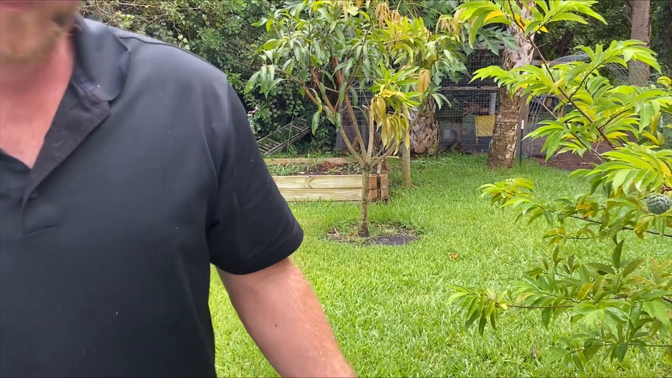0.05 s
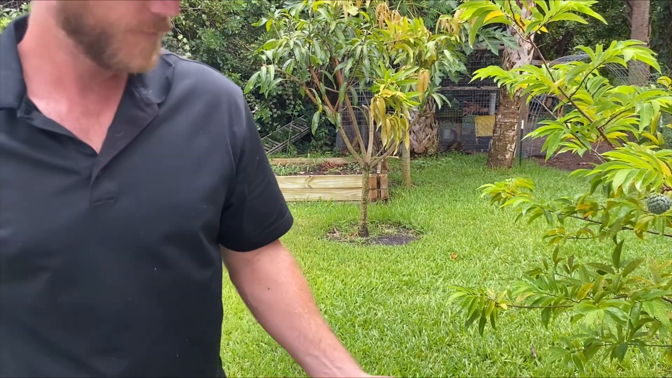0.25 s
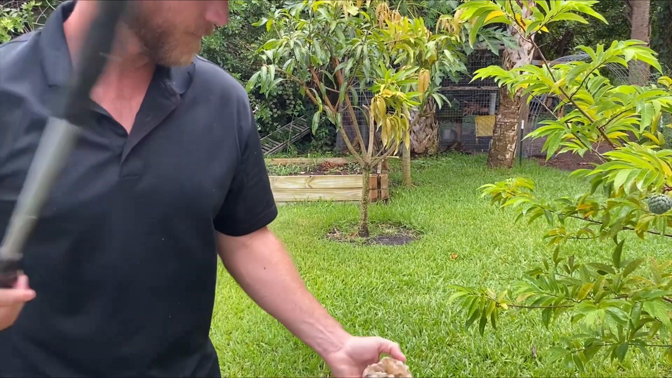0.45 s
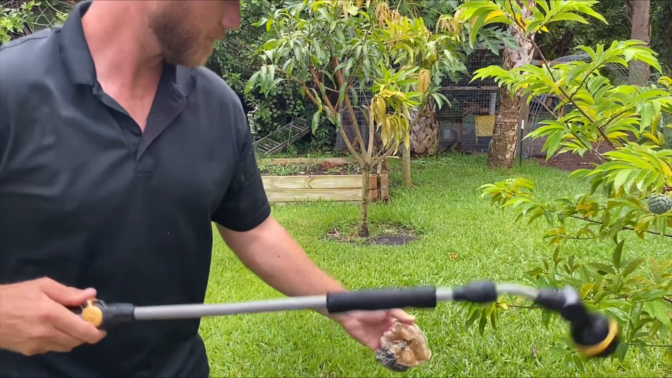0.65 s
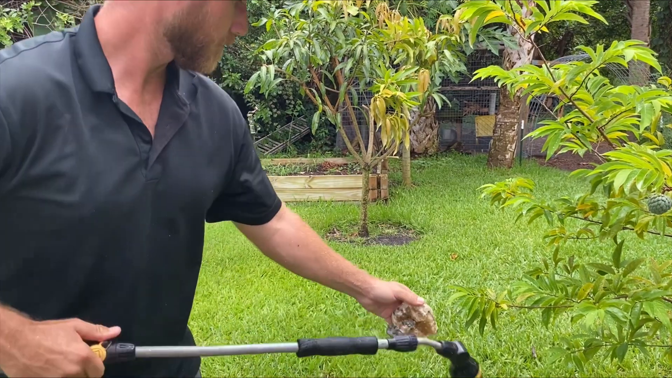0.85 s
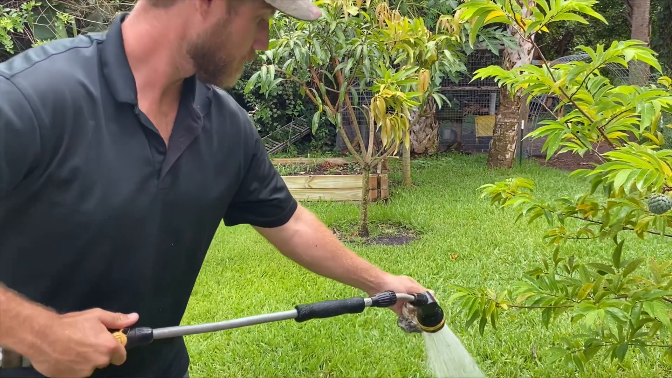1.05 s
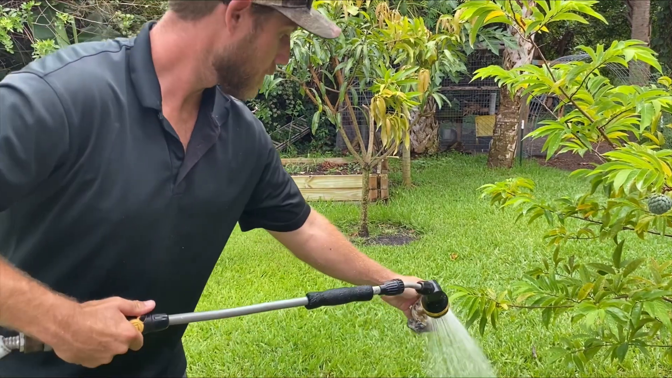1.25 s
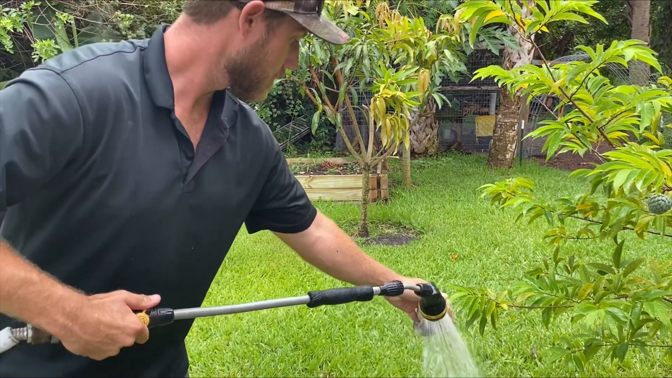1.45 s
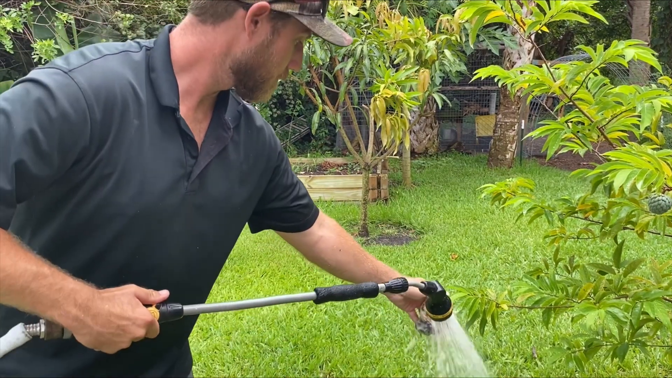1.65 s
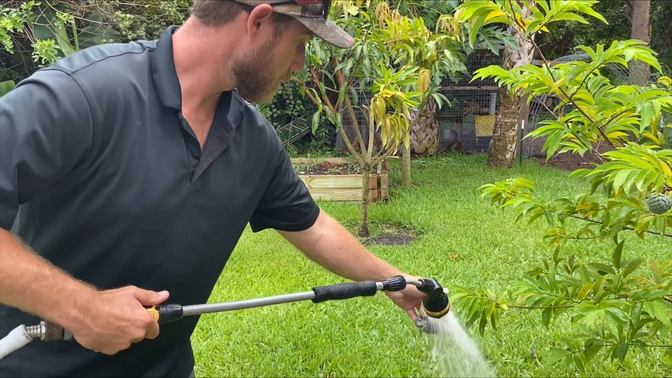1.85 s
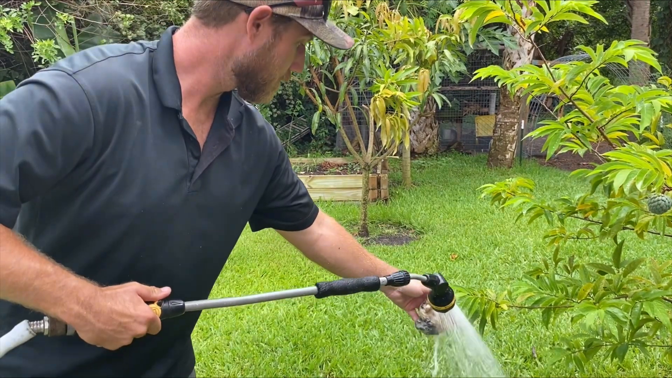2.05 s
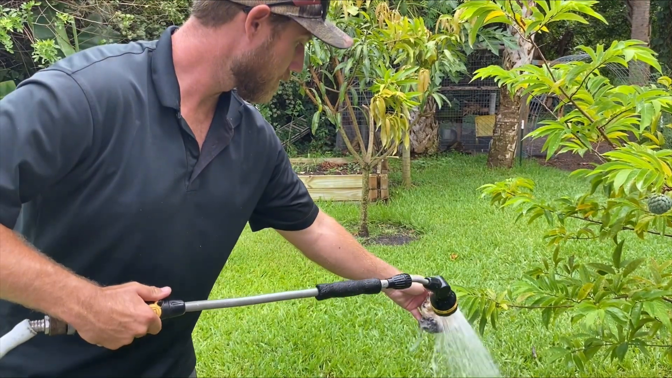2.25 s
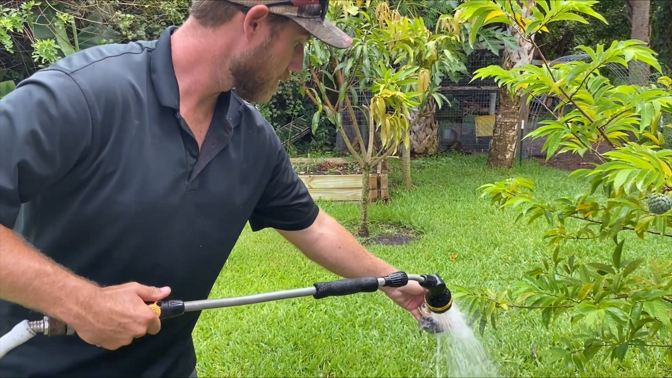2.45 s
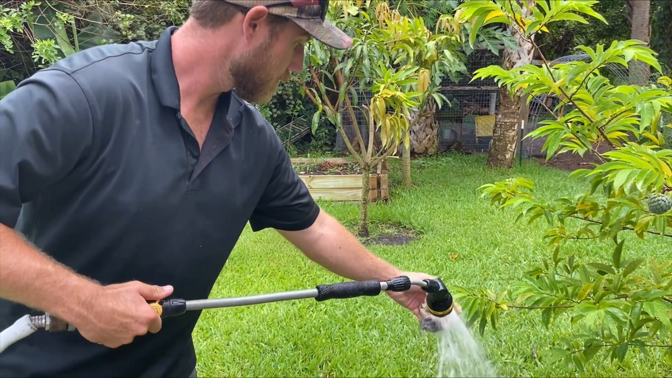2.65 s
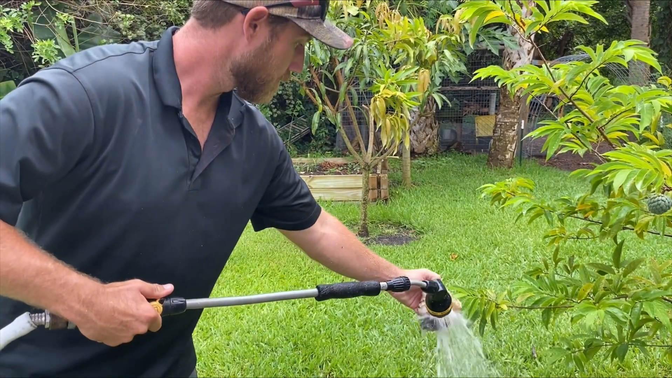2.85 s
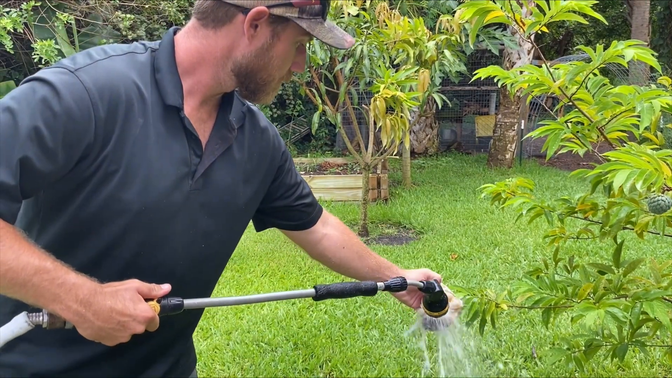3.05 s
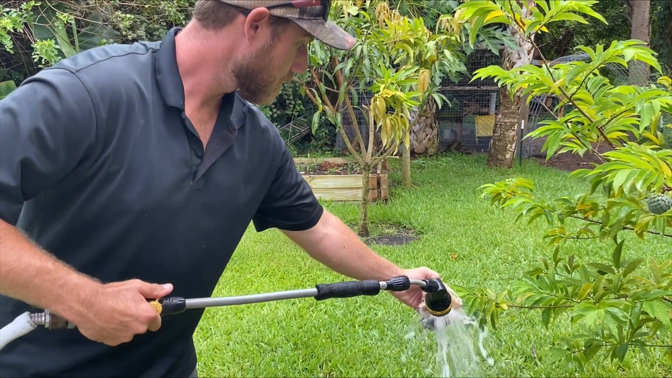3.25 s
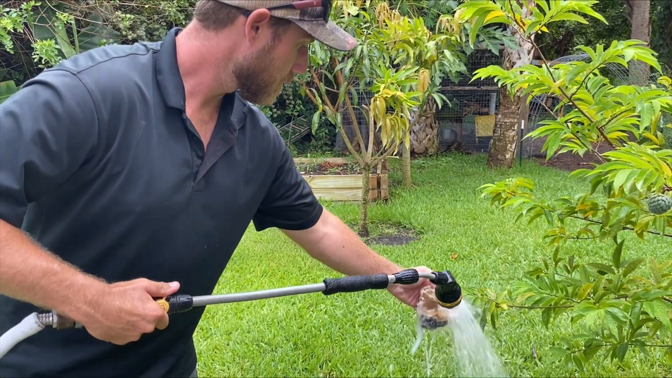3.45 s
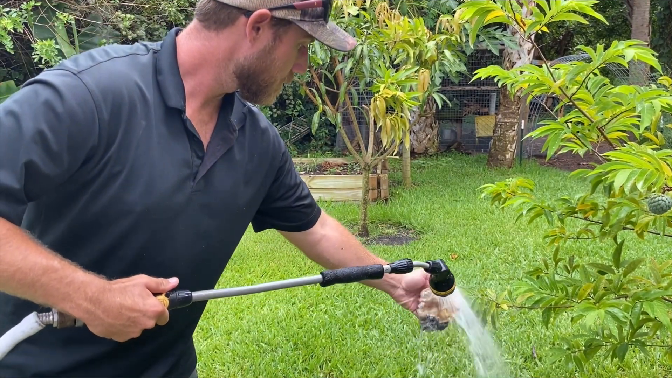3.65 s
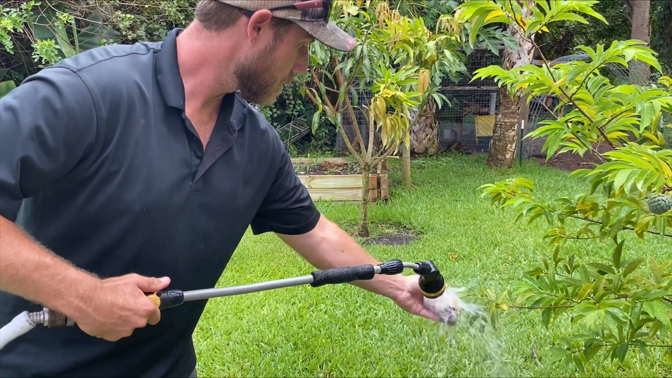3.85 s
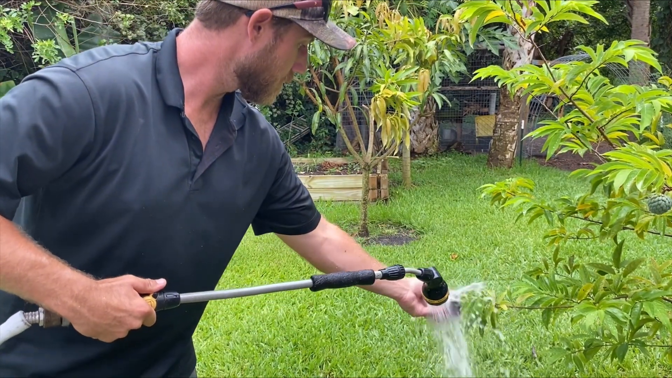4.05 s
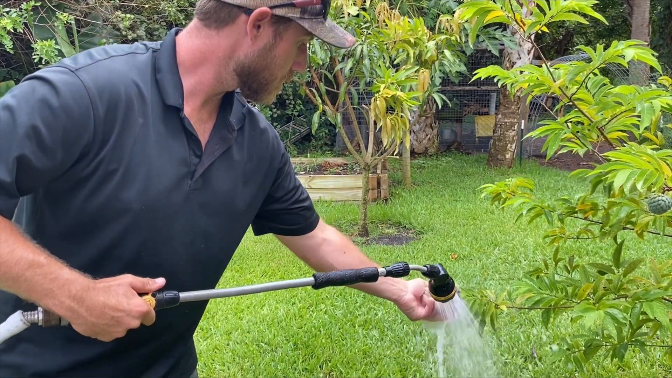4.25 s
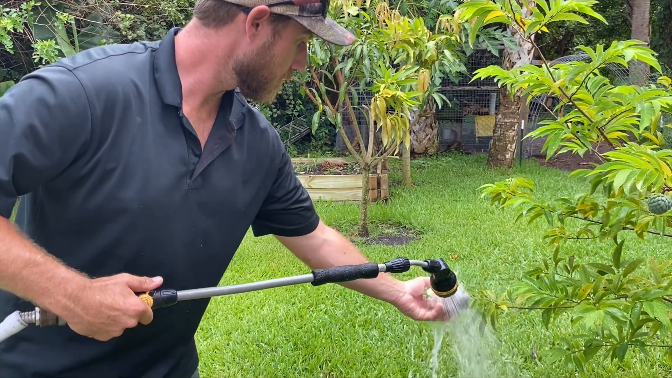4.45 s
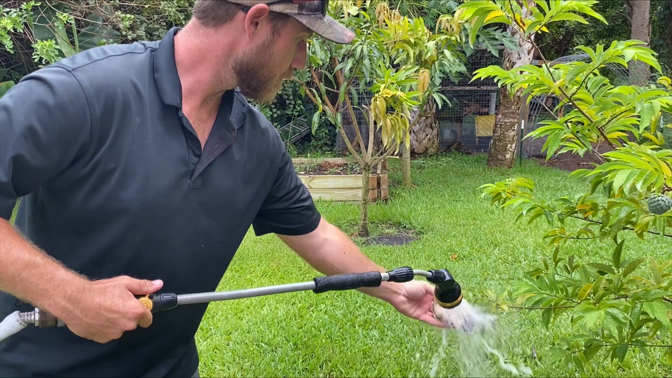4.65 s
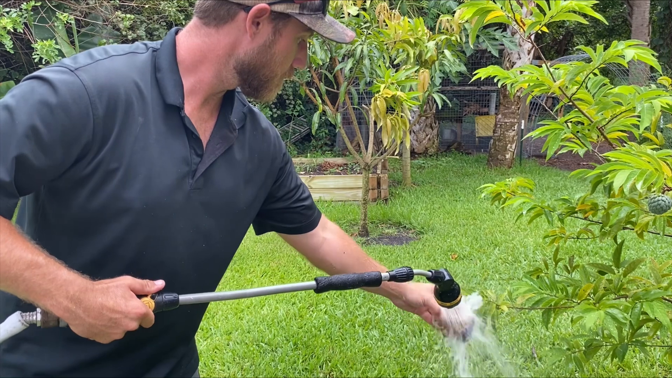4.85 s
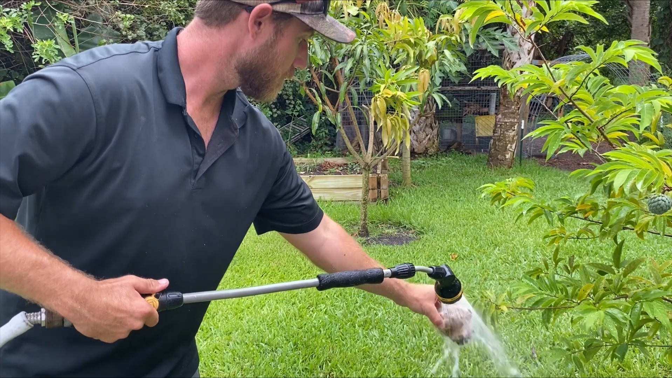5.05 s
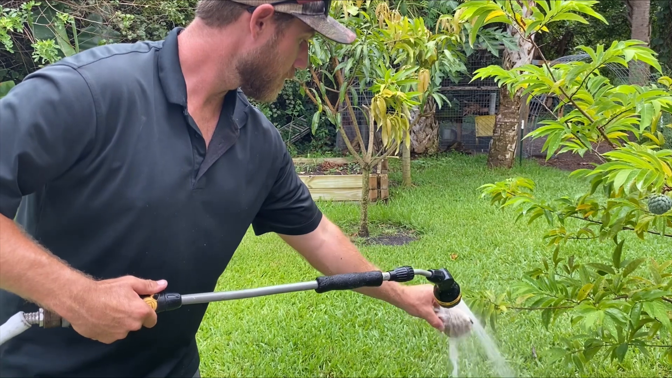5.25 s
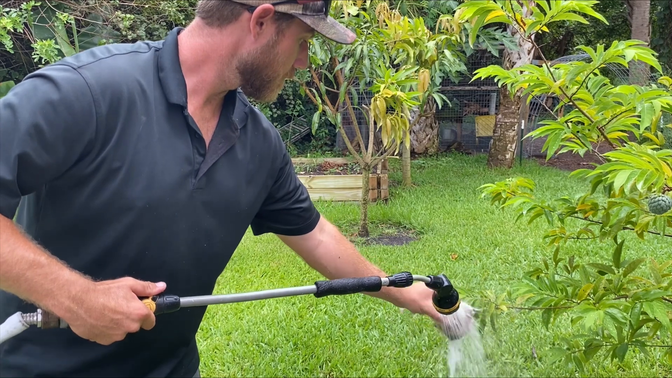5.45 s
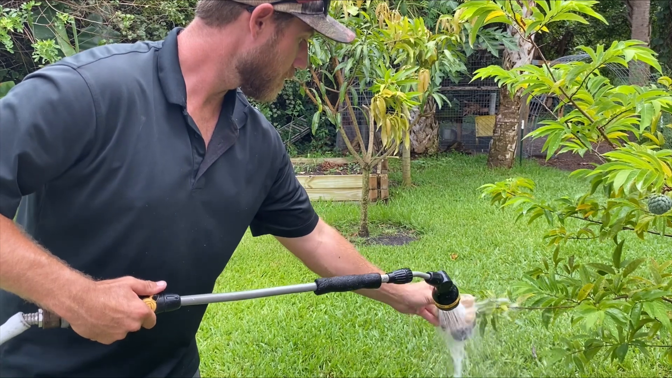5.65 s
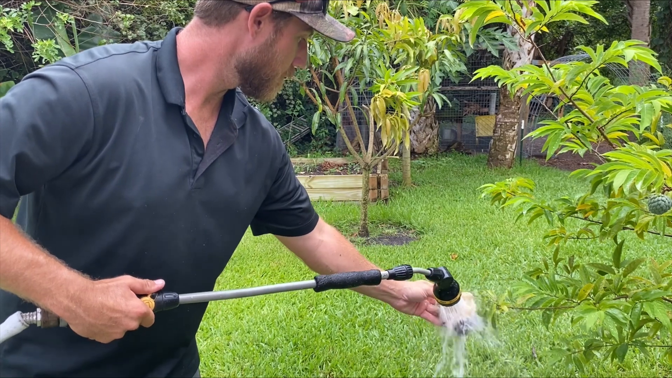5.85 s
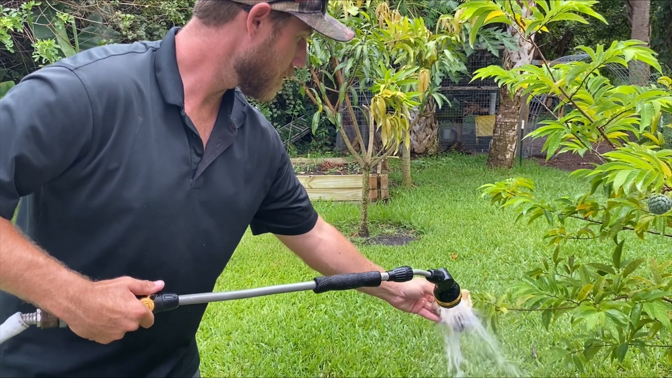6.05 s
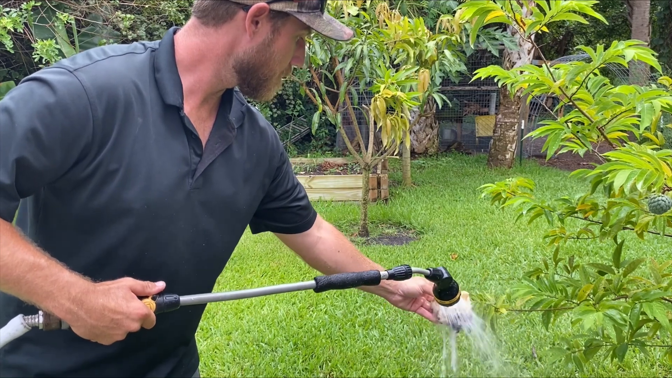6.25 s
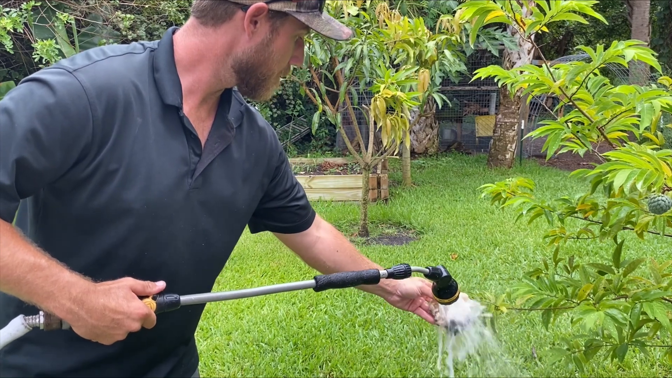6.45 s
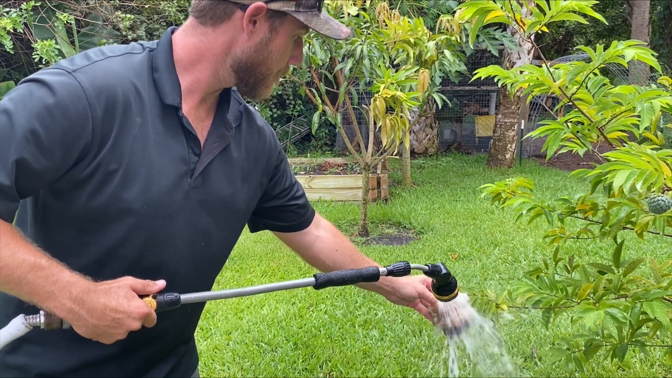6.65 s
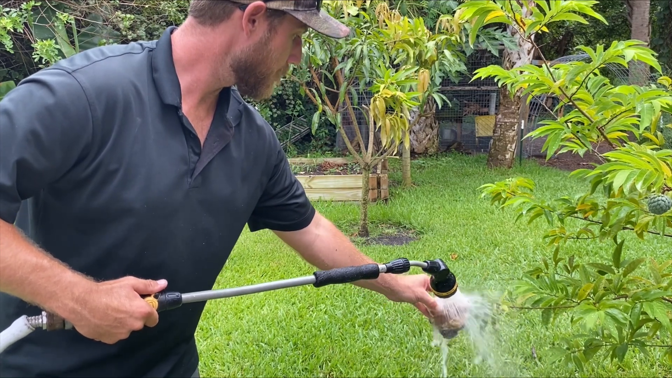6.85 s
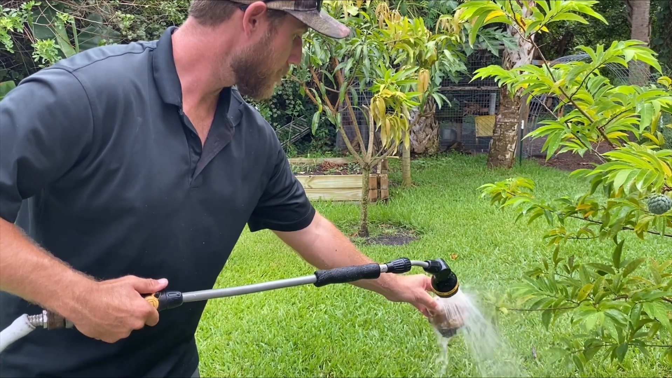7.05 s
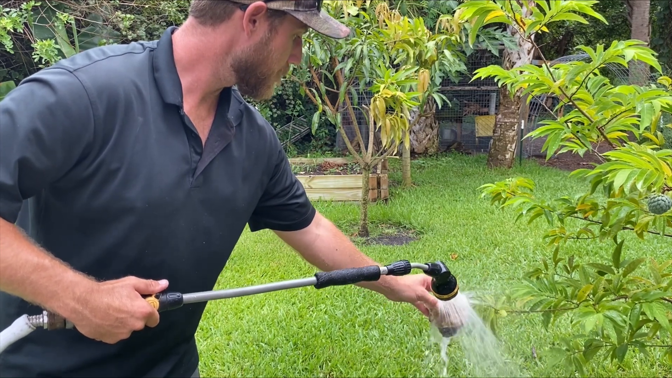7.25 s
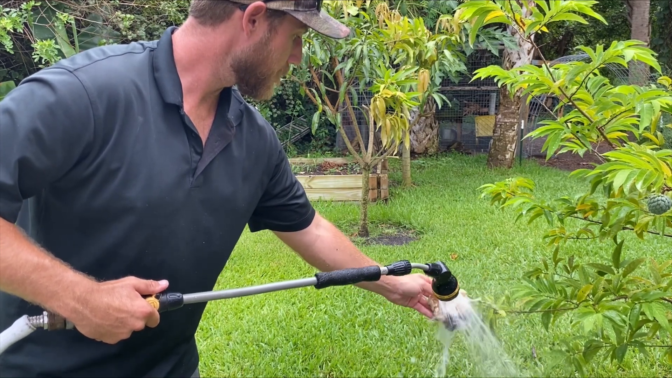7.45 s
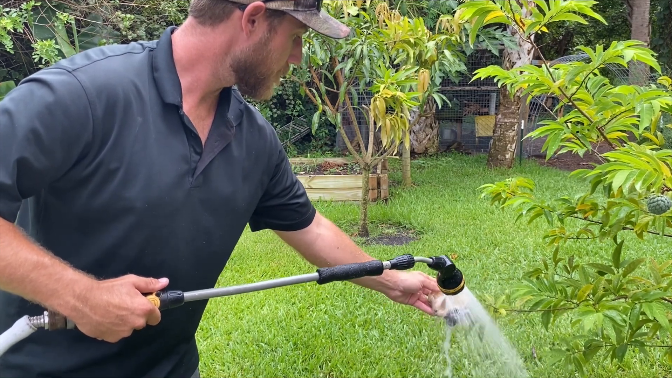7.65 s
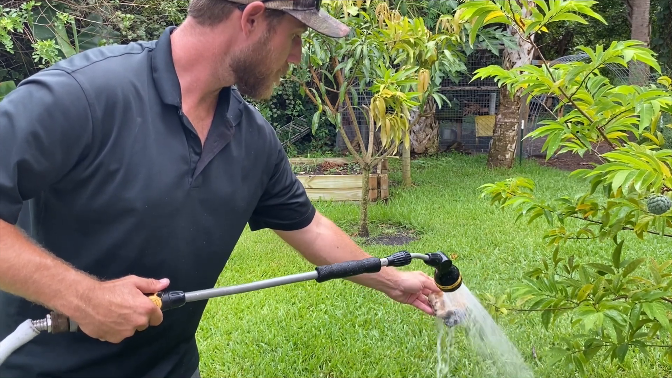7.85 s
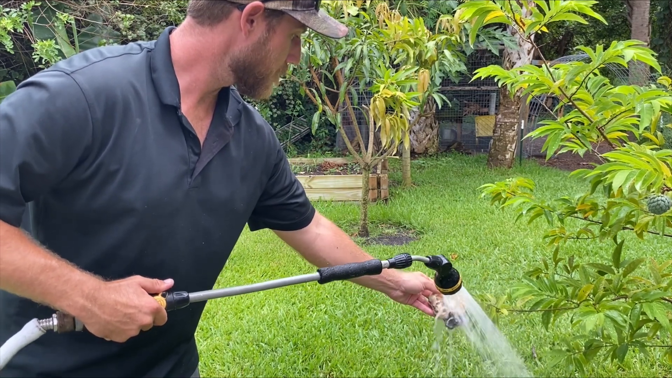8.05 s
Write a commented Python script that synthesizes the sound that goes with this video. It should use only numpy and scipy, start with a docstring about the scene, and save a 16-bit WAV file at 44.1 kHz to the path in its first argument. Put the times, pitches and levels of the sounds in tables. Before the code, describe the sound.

A quiet backyard, heard close in stereo: a soft low distant rumble, faint open air and a thin high insect shimmer. From 0 to 0.45 s a shirt rustles and tiny dry ticks come from handling a watering wand, with another rustle near 0.6. At 0.67 the valve opens: trapped air spits and whistles briefly, water thumps and sputters until about 0.85. A lighter spray follows, and from 1.2 brisk splatter begins as a hand enters the jets. To 3.4 s it is dense, with sharp drops and gurgles; from 3.4 to 5.9 it comes in looser bursts, hissing fans and rising bubbles in the palm. Around 6.0 to 6.7 the splashing is strong and cupped, then thins to mostly hiss until 7.3, when bright splatter returns, continuing unevenly to the end just past 8 s. The hiss grows slightly; only faint, short body reflections, no room echo.

```python
"""A shirt rustles and small ticks sound over a low distant rumble and faint insects in a backyard.
A watering wand opens: trapped air whistles and water sputters out, then fine jets hiss as random impacts.
Drops splatter on a turning hand as impacts and damped bubble rings, and gurgle in its palm.
Noise sources are random signals shaped by a spectrum and an envelope; short delays add reflections off the body."""
import sys
import numpy as np
from scipy import signal
from scipy.fft import rfft, irfft, next_fast_len
from scipy.io import wavfile
from scipy.ndimage import uniform_filter1d, map_coordinates

SR = 44100
rng = np.random.default_rng(int(sys.argv[2]) if len(sys.argv) > 2 else 0)


def master(y):
    """Save y as 16-bit WAV."""
    cut = np.clip(np.atleast_2d(y).T, -1, 1)
    pcm = np.round(cut * 32767)  # scale
    wavfile.write(sys.argv[1], SR, pcm.astype(np.int16))


N = 357210
TOP_HZ = 15850  # upper limit of the band


def amp(db):
    """Level to amplitude: 20 dB is a factor of ten."""
    return 10 ** (np.asarray(db) / 20)


def unit(x):
    """Normalization: scale to rms 1."""
    return x / np.sqrt(np.mean(x ** 2) + 1e-20)


def along(points, hz):
    """Interpolation of (frequency, value) points on a logarithmic frequency axis."""
    f, v = np.transpose(points)
    return np.interp(np.log(hz + 1), np.log(f + 1), v)


def curves(rows):
    """Linear interpolation in time: one value per sample for each column after the time."""
    s, *cols = np.transpose(rows)
    return [np.interp(np.arange(N) / SR, s, c) for c in cols]


def wobble(rate):
    """Slow random modulation: a smooth curve through Gaussian knots, rate knots a second."""
    knots = rng.standard_normal(int(N * rate / SR) + 4)
    return map_coordinates(knots, [np.arange(N) * rate / SR])


def filtered(x, response):
    """Linear filtering: the spectrum of x times a response of frequency."""
    m = next_fast_len(N + SR // 4)
    return irfft(rfft(x, m) * response(np.fft.rfftfreq(m, 1 / SR)), m)[..., :N]


def coloured(x, spectrum):
    """Spectral shaping: x filtered by the given spectrum, at rms 1."""
    return unit(filtered(x, lambda hz: amp(along(spectrum, hz))))


def noise(spectrum):
    """Gaussian noise: two incoherent signals of one colour."""
    return coloured(rng.standard_normal((2, N)), spectrum)


def impacts(spectrum, rate):
    """Shot noise: two incoherent showers of tiny impacts of random size, rate a second."""
    strikes = rng.random((2, N)) < rate / SR
    return coloured(rng.standard_normal((2, N)) * strikes, spectrum)


def bubbles(pitch_hz, rate, spread, cycles, size_db, size=160):
    """Bubble resonance: two showers of short damped rings, scattered in pitch about a moving centre."""
    t, rows = np.arange(size) / SR, []
    for _ in range(2):
        at = np.flatnonzero(rng.random(N) < min(rate, 3000) / SR)
        scatter = np.exp(spread * rng.standard_normal(len(at)))
        hz = np.minimum(pitch_hz[at] * scatter, TOP_HZ)[:, None]
        strength = amp(size_db * np.minimum(rng.exponential(size=hz.shape), 4))
        rings = strength * np.sin(2 * np.pi * hz * t) * np.exp(-hz * t / cycles)
        places = at[:, None] + np.arange(size)
        rows.append(np.bincount(places.ravel(), rings.ravel(), N)[:N])
    return unit(np.array(rows))


def resonance(hz, width_hz):
    """Resonance: two noises concentrated about one frequency."""
    return unit(filtered(rng.standard_normal((2, N)), lambda f: 1 / (1 + (2 * (f - hz) / width_hz) ** 2)))


def ports(pair, alike, lead=((0, 0), (1, 0)), shading=((0, 0), (1, 0))):
    """Interaural-style coherence: mix two signals to left and right with set likeness, phase and level."""
    m = next_fast_len(N + SR // 4)
    hz, (a, b) = np.fft.rfftfreq(m, 1 / SR), rfft(pair, m)
    angle = np.arccos(np.clip(along(alike, hz), -1, 1)) / 2
    mid, side = a * np.cos(angle), b * np.sin(angle)
    # each port takes half of the phase and level difference
    half = amp(along(shading, hz) / 2) * np.exp(.5j * np.interp(hz, *np.transpose(lead)))
    return irfft(np.array([(mid + side) * half, (mid - side) / half]), m)[:, :N]


def taps(rows, t60, octaves):
    """Impulsive excitation: each row is a decaying burst of noise about its own pitch, with a sharp start."""
    out, t = np.zeros((2, N)), np.arange(SR // 20) / SR
    f = np.fft.rfftfreq(len(t), 1 / SR) + 1
    decay = amp(-60 * t / t60)
    for s, db, hz in rows:
        band = 1 / (1 + (np.log2(f / hz) / octaves) ** 4)
        burst = decay * irfft(rfft(rng.standard_normal((2, len(t)))) * band, len(t))
        # the energy of each burst is set by its decay alone
        burst *= np.linalg.norm(decay) / np.linalg.norm(burst, axis=1, keepdims=True)
        out[:, round(s * SR):][:, :len(t)] += .5 * amp(db) * burst
    return out


def patchy(x, depth_db, order=(5, 40)):
    """Random modulation: smooth patches of gain over frequency and time."""
    z = signal.stft(x, nperseg=512)[2]
    field = rng.standard_normal(z.shape[1:])
    field = uniform_filter1d(field, order[0], 0)
    field = uniform_filter1d(field, order[1], 1)
    return signal.istft(z * amp(depth_db * unit(field)), nperseg=512)[1][:, :N]


def echo(x, delay_s):
    """Reflection: a delayed copy off a nearby surface whose distance changes slowly."""
    n = np.arange(N)
    return np.array([np.interp(n - delay_s * SR, n, channel) for channel in x])


def envelope(starts, lengths, levels_db, attack_s, release_s, arch_db=0):
    """Power addition: events that rise, hold (arched by arch_db) and decay exponentially."""
    t = np.arange(N) / SR
    coarse = t[::32]
    age, hold = coarse - starts[:, None], lengths[:, None]
    shape = np.clip(age / attack_s, 0, 1) * np.exp(-np.maximum(age - hold, 0) / release_s)
    arch = arch_db * (np.sin(np.pi * np.clip(age / hold, 0, 1)) - 2 / np.pi)
    gains = amp(levels_db[:, None] + arch) * shape
    return np.interp(t, coarse, np.linalg.norm(gains, axis=0))


# slow swell of the distant rumble: (time [s], level [dB])
RUMBLE_SWELL = [(0, -49), (1.3, -49.5), (2.2, -51), (3.2, -50), (4.7, -51), (6.5, -49), (8.1, -50)]
# spectra of rumble, open air and insects: (frequency [Hz], relative level [dB])
RUMBLE_SPECTRUM = [(13, -47), (22, -35), (51, -5), (70, 3.5), (97, -5.5), (130, -4), (215, -18.5),
                   (330, -27), (430, -37), (730, -120)]
YARD_SPECTRUM = [(100, -1), (300, -2), (550, -1.5), (780, -0.5), (1200, -7.5), (2500, -20), (4000, -17),
                 (16000, -43)]
INSECT_SPECTRUM = [(5900, -45), (6500, -14), (6800, -1), (7130, 2), (7480, -12), (8100, -45)]


def yard():
    """Band-limited noise: distant rumble, the faint wash of open air and a thin, trembling band of insects."""
    rumble_db, = curves(RUMBLE_SWELL)
    rumble = amp(rumble_db + 0.84 * wobble(6)) * noise(RUMBLE_SPECTRUM)
    tremble = amp(-65.5 + 0.96 * wobble(100) + 0.83 * wobble(9))
    insects = tremble * patchy(noise(INSECT_SPECTRUM), depth_db=3.7, order=(2, 5))
    return rumble + amp(-64.5) * noise(YARD_SPECTRUM) + insects


# moves of the arm: (start [s], length [s], level [dB])
ARM_MOVES = [(0, 0.31, -60.5), (0.326, 0.11, -75), (0.61, 0.21, -62)]
RUSTLE_RISE_S, RUSTLE_FALL_S = 0.027, 0.058
# spectrum of rubbing cloth: (frequency [Hz], relative level [dB])
CLOTH_SPECTRUM = [(150, -27), (500, 3), (1500, 0), (3500, -4.5), (7000, -15), (11000, -6), (16000, -12.5)]


def shirt():
    """Friction as shot noise: cloth rustles in tiny impacts as the arm lifts the wand."""
    moves = envelope(*np.transpose(ARM_MOVES), RUSTLE_RISE_S, RUSTLE_FALL_S)
    return moves * amp(wobble(120.5)) * impacts(CLOTH_SPECTRUM, rate=4000)


# small ticks of handling: (time [s], relative level [dB], pitch [Hz])
TICKS = [(0.055, -43, 5000), (0.102, -50, 2900), (0.116, -41, 2300), (0.124, -44, 2900), (0.132, -50, 4000),
         (0.149, -35.5, 2290), (0.2155, -39, 2900), (0.226, -48, 2600), (0.257, -42, 3100),
         (0.298, -51, 4230), (0.433, -47, 1600)]


def handling_ticks():
    """Impulsive excitation: handling the wand makes short, quickly damped ticks."""
    return taps(TICKS, t60=0.0057, octaves=0.62)


# spurts as the valve opens: (start [s], length [s], air level [dB], sputter level [dB])
SPURTS = [(0.673, 0.022, -36.5, -50.5), (0.694, 0.035, -36.5, -54), (0.73, 0.022, -45, -45.5),
          (0.754, 0.025, -39, -41.5), (0.784, 0.017, -43, -44.5), (0.801, 0.018, -39.5, -57),
          (0.827, 0.044, -51, -55.5), (0.904, 0.38, -53.5, -57.5)]
SPURT_RISE_S, SPURT_FALL_S = 0.0024, 0.009
# spectra of escaping air and sputtering water: (frequency [Hz], relative level [dB])
AIR_SPECTRUM = [(400, -39), (1500, -18), (3500, -12), (6000, 6), (8500, -3), (11000, -0.5), (13000, -4),
                (16000, -5)]
SPUTTER_SPECTRUM = [(150, -37), (450, -7), (800, -3.5), (1300, -1), (2000, -2), (3600, -3.5), (6000, -1.5),
                    (15000, -16)]
# slugs of water thumping out of the spray head: (time [s], relative level [dB], pitch [Hz])
SLUGS = [(0.732, -35.5, 654), (0.786, -40.5, 700)]
# brief whistles of the air: (start [s], length [s], start pitch [Hz], end pitch [Hz], level [dB])
WHISTLES = [(0.703, 0.043, 5700, 6800, -39.5), (0.695, 0.035, 11000, 11400, -42),
            (0.718, 0.022, 3700, 3550, -41), (0.69, 0.04, 2350, 2900, -45), (0.678, 0.045, 1500, 1150, -46),
            (0.735, 0.035, 950, 1400, -44), (0.80, 0.025, 5900, 5650, -42)]


def spit():
    """Turbulent jet noise and whistling: trapped air blows through the holes and slugs of water sputter."""
    start, length, air_db, sputter_db = np.transpose(SPURTS)
    air_gain = envelope(start, length, air_db, SPURT_RISE_S, SPURT_FALL_S)
    air = air_gain * amp(wobble(350)) * noise(AIR_SPECTRUM)
    sputter_gain = envelope(start, length, sputter_db, SPURT_RISE_S, SPURT_FALL_S)
    sputter = sputter_gain * amp(0.66 * wobble(200)) * impacts(SPUTTER_SPECTRUM, rate=4000)
    valve_open = np.arange(N) / SR > start[0]
    out = patchy(air + sputter, depth_db=3.5, order=(4, 4)) * valve_open
    out = out + taps(SLUGS, t60=0.041, octaves=0.83)
    for s, length, start_hz, end_hz, db in WHISTLES:
        count = int(length * SR)
        phase = 2 * np.pi * np.cumsum(np.linspace(start_hz, end_hz, count)) / SR
        flutter = np.cumsum(rng.normal(0, 0.13, (2, count)), axis=1)  # turbulence blurs the pitch
        out[:, round(s * SR):][:, :count] += amp(db) * np.hanning(count) * np.sin(phase + flutter)
    return out


# hiss of the jets as the pressure builds: (time [s], relative level [dB])
JETS = [(0.84, -55), (1.03, -62), (1.18, -53), (1.28, -51), (1.64, -48.5), (1.69, -54.5), (1.85, -50),
        (1.99, -51.5), (2.17, -50.5), (2.28, -51.5), (2.34, -49), (3.3, -47.5), (4.25, -47), (5.3, -46.5),
        (6.5, -45), (7.1, -47), (7.8, -46.5), (8.1, -45)]
# the spray fans off the fingers: (start [s], length [s], relative hiss level [dB])
FANS = [(0.902, 0.03, -49.5), (1.5, 0.091, -49), (3.72, 0.25, -49), (4.45, 0.25, -45.5), (4.827, 0.2, -45),
        (5.273, 0.055, -48), (5.69, 0.31, -47), (6.66, 0.3, -48.5), (7.336, 0.08, -47)]
FAN_RISE_S, FAN_FALL_S = 0.029, 0.02
MIST_SHARE = 0.46  # part of the splatter gain that flies off as fine hissing mist
# spectrum of the mist: (frequency [Hz], relative level [dB])
HISS_SPECTRUM = [(150, -37), (400, -13), (900, -13.5), (2000, -9), (3500, -8), (5300, -2.5), (6400, -6),
                 (7500, -1), (10300, 1.5), (12000, -0.5), (14000, 2.5), (15200, 3.5), (16000, 0)]
HEAD_LOW_HZ, HEAD_HIGH_HZ = 1117, 1303  # two resonances of the hollow spray head
# their levels: (time [s], relative level of the low [dB], relative level of the high [dB])
HEAD_LEVELS = [(0.88, -66, -65), (1.05, -54.5, -62), (1.7, -61, -66), (2.3, -62, -67), (2.9, -61, -57),
               (3.5, -64, -62.5), (3.9, -59.5, -57.5), (4.75, -67.5, -70), (5.0, -69, -59.5),
               (5.5, -63.5, -59.5), (6.05, -74, -64.5), (6.95, -70, -60.5), (7.25, -65.5, -62.5),
               (8.1, -63, -56.5)]


def jets(splat):
    """Jet break-up and cavity resonance: droplets hiss, more so on the hand, and the flow rings the head."""
    hiss_db, = curves(JETS)
    low_db, high_db = curves(HEAD_LEVELS)
    fans = envelope(*np.transpose(FANS), FAN_RISE_S, FAN_FALL_S)
    free_spray = amp(5.5) * np.hypot(amp(hiss_db), fans)
    mist = np.hypot(free_spray, MIST_SHARE * splat)
    flicker = amp(0.71 * wobble(30) + 0.22 * wobble(300))
    hiss = mist * flicker * patchy(impacts(HISS_SPECTRUM, rate=13000), depth_db=1.56, order=(3, 24))
    low = amp(low_db) * resonance(HEAD_LOW_HZ, width_hz=210)
    high = amp(high_db) * resonance(HEAD_HIGH_HZ, width_hz=120)
    return hiss + amp(-2.0) * (low + high)


ENTER_S, DRAIN_S = 0.012, 0.02  # rise as the hand enters the spray, decay constant as water drains
GRAZE_DB, TRICKLE_DB = -56.5, -60.5  # splatter and gurgle between turns
# turns of the hand into the spray:
# (start [s], length [s], splatter level [dB], gurgle level [dB], cupping of the palm [0-1])
TURNS = [(0.905, 0.027, -60, -56, 0.66), (1.195, 0.17, -49.5, -57, 0.06), (1.323, 0.092, -45.5, -56, 0.06),
         (1.443, 0.043, -45, -47, 0), (1.61, 0.075, -44.5, -70, 0), (1.692, 0.055, -47.5, -66, 0),
         (1.742, 0.17, -44.5, -52.5, 0.17), (2.025, 0.092, -46, -53, 0.2), (2.121, 0.115, -43.5, -56, 0),
         (2.291, 0.14, -45, -53.5, 0.1), (2.452, 0.25, -46, -56, 0.18), (2.68, 0.39, -44.5, -51.5, 0.22),
         (3.073, 0.082, -44.5, -52, 0.42), (3.134, 0.2, -43, -54, 0.07), (3.335, 0.04, -46, -67, 0.2),
         (3.43, 0.13, -54.5, -64, 0.1), (3.56, 0.1, -51.5, -64, 0.26), (3.677, 0.11, -48, -66, 0),
         (3.79, 0.24, -47.5, -54.5, 0.4), (4.068, 0.15, -50, -60, 0.77), (4.265, 0.13, -48.5, -56.5, 0),
         (4.436, 0.16, -53, -57, 0.17), (4.532, 0.22, -46, -68, 0.13), (4.8, 0.067, -49, -70, 0.27),
         (4.918, 0.19, -47, -57, 0.44), (5.29, 0.085, -52, -62, 0), (5.395, 0.24, -53, -72, 0.2),
         (5.58, 0.44, -48, -62, 0.56), (6.014, 0.064, -42.5, -52, 0.33), (6.085, 0.23, -45, -54.5, 0.52),
         (6.27, 0.073, -45, -53, 0.5), (6.35, 0.25, -45.5, -59, 0.7), (6.592, 0.12, -46, -74, 0.44),
         (6.717, 0.26, -60, -74, 0.3), (7.2, 0.17, -57.5, -72, 0.4), (7.339, 0.11, -46.5, -59, 0.2),
         (7.428, 0.057, -43, -49, 0.04), (7.49, 0.11, -45.5, -54.5, 0.4), (7.78, 0.084, -52.5, -64, 0.2),
         (7.866, 0.11, -44.5, -59, 0.07), (7.985, 0.16, -48, -53, 0.3)]


def hand():
    """Source modulation: splatter gain, gurgle gain and cupping as the hand turns through the spray's core."""
    start, length, splat_db, gurgle_db, cupping = np.transpose(TURNS)
    splat = envelope(start, length, splat_db, ENTER_S, DRAIN_S, arch_db=0.5)
    pooling = envelope(start, length, gurgle_db, ENTER_S, DRAIN_S, arch_db=3.0)
    cupped = np.interp(np.arange(N) / SR, start + length / 2, np.clip(cupping, 0, 1))
    return np.hypot(amp(GRAZE_DB), splat), np.hypot(amp(TRICKLE_DB), pooling), cupped


FLAT_HAND_HZ, CUPPED_HAND_HZ = 3756, 2950  # centre pitch of the tiny bubbles
# spectra of smacks on a flat and a cupped hand, and of gurgling: (frequency [Hz], relative level [dB])
FLAT_SPECTRUM = [(500, -34), (2000, -28), (2600, -5.5), (3600, -0.5), (4350, 2.5), (4750, -2), (6500, -5.5),
                 (8500, -9.5), (15000, -24)]
CUPPED_SPECTRUM = [(500, -31), (1900, -34), (2250, -2), (2800, 2.5), (3500, -15), (4500, -6.5),
                   (6500, -6.5), (15000, -20)]
GURGLE_SPECTRUM = [(300, -32), (850, -4.5), (1200, 3.5), (1750, 3), (2300, 2), (3500, -4), (8000, -41)]


def splash(splat, pooling, cupped):
    """Drop impact and bubble resonance: clumped smacks, tiny bubbles, sparse fat drops, a lower gurgle."""
    pitch_hz = FLAT_HAND_HZ + cupped * (CUPPED_HAND_HZ - FLAT_HAND_HZ)
    clumps = amp(0.63 * wobble(40) + wobble(220))
    flat_smacks = np.sqrt(1 - cupped) * impacts(FLAT_SPECTRUM, rate=4000)
    cupped_smacks = np.sqrt(cupped) * impacts(CUPPED_SPECTRUM, rate=4000)
    fizz = bubbles(pitch_hz, rate=1100, spread=0.14, cycles=4.4, size_db=2.5)
    fat = bubbles(0.85 * pitch_hz, rate=90, spread=0.22, cycles=4.7, size_db=1.5, size=400)
    clumped = clumps * (amp(-3.0) * (flat_smacks + cupped_smacks) + amp(-6.5) * fizz)
    splatter = splat * (clumped + amp(-15.0) * fat)
    gurgle = pooling * amp(-3.0 + 1.66 * wobble(45)) * impacts(GURGLE_SPECTRUM, rate=3000)
    return patchy(splatter + gurgle, depth_db=1.15)


# single heavy drops: (time [s], relative level [dB], pitch [Hz])
DROPS = [(1.352, -31, 4300), (1.619, -36, 4130), (1.644, -33, 3850), (1.752, -36, 1730), (1.886, -30, 4430),
         (1.897, -30, 3620), (2.121, -35, 4370), (2.299, -35, 4230), (2.542, -38, 4200), (2.661, -34, 2450),
         (3.085, -32, 2970), (3.275, -29, 3800), (3.398, -32, 5600), (3.508, -37, 6600), (3.7, -35, 3500),
         (3.887, -35, 2300), (4.014, -33, 2400), (4.152, -32, 2570), (4.282, -41, 1990), (4.429, -38, 952),
         (4.488, -36, 3720), (5.521, -33, 7000), (5.613, -34, 2680), (5.728, -36, 2680), (7.121, -35, 2770),
         (7.281, -42, 2330), (7.925, -33, 2720)]
# bubble under a drop: level relative to its drop, ring time, relative rise in pitch per second
PLINK_DB, PLINK_T60_S, PLINK_RISE_PER_S = -4.5, 0.019, 5.5


def drips():
    """Impact and bubble resonance: a heavy drop smacks the wet hand and its bubble rings, rising in pitch."""
    out = taps(DROPS, t60=0.01, octaves=0.32) * amp(-2)
    t = np.arange(SR // 30) / SR
    for s, db, hz in DROPS:
        cycles = hz * t * (1 + PLINK_RISE_PER_S * t / 2)
        ring = np.sin(2 * np.pi * cycles) * amp(-60 * t / PLINK_T60_S)
        # the first row is the part common to both ports
        out[0, round(s * SR):][:len(t)] += amp(db + PLINK_DB) * ring
    return out


# the palm or a gap between fingers fills:
# (start [s], length [s], start pitch [Hz], end pitch [Hz], level [dB])
FILLS = [(1.622, 0.045, 3720, 4000, -45.5), (2.465, 0.081, 3750, 4050, -46), (2.59, 0.08, 3270, 3800, -47),
         (2.75, 0.3, 1250, 1490, -61), (3.05, 0.12, 1620, 1860, -53.5), (3.168, 0.18, 3500, 3900, -51),
         (3.692, 0.032, 3400, 3840, -48), (3.856, 0.079, 1400, 1800, -58), (3.92, 0.12, 4020, 4470, -50),
         (3.97, 0.23, 2350, 2650, -53.5), (4.556, 0.05, 3450, 3700, -49), (6.176, 0.2, 1460, 1750, -56.5),
         (8.003, 0.086, 1370, 1500, -59.5)]


def palm():
    """Cavity filling: bubbles in a hollow of the hand climb in pitch as the hollow shrinks."""
    start, length, start_hz, end_hz, db = np.transpose(FILLS)
    times = np.ravel([start, start + length], "F")
    pitch_hz = np.interp(np.arange(N) / SR, times, np.ravel([start_hz, end_hz], "F"))
    burble = bubbles(pitch_hz, rate=1000, spread=0.12, cycles=6.5, size_db=0.5, size=600)
    return envelope(start, length, db, ENTER_S, DRAIN_S) * burble


# the bounce off the chest shifts as the body leans: (time [s], delay [s])
CHEST_BOUNCE = [(1.2, 0.00339), (2.3, 0.0034), (2.9, 0.00349), (3.8, 0.0035), (4.6, 0.0038), (5.9, 0.00348),
                (8.1, 0.00347)]
SPRAY_BOUNCE, SPLATTER_BOUNCE = 0.082, 0.29  # share of each that comes back from the chest


def reflections(spray, splatter):
    """Early reflection: chest and forearm return delayed, weaker copies of the water."""
    bounce_s, = curves(CHEST_BOUNCE)
    chest = echo(SPRAY_BOUNCE * spray + SPLATTER_BOUNCE * splatter, bounce_s)
    forearm = 0.073 * echo(spray + splatter, 0.00131 * (1 + 0.15 * wobble(1.5)))
    return chest + forearm


# left-right likeness of near and far sounds: (frequency [Hz], coherence [-1 to 1])
NEAR = [(300, 0.71), (700, 0.32), (1300, 0.77), (2000, 0.96), (2600, 1), (4000, 1), (5200, 0.56),
        (6400, 0.15), (7600, 0.88), (8800, 1), (16000, 0.72)]
FAR = [(60, 1), (130, 0.93), (290, 0.63), (640, 0.06), (3000, 0.22), (7000, 0.58), (16000, 0.23)]
# the water's treble reaches the right port first: (frequency [Hz], phase by which left leads [rad])
LEAD = [(0, 0), (4200, 0), (6100, -2.4), (6600, -5.9), (9000, -9.4), (11150, -12.6), (13250, -15.7),
        (16000, -19.7)]
# the left port is brighter in the low treble: (frequency [Hz], left minus right [dB])
SHADING = [(700, 0), (1300, -1), (2200, 0), (4000, 0), (5000, 2.5), (7000, 2.3), (8600, 0), (16000, 0)]


def scene():
    """Superposition: close water with body reflections, ticks nearby and the yard all around."""
    surroundings = ports(yard() + shirt(), FAR)
    ticks = ports(handling_ticks(), NEAR)
    flow, = curves([(0.76, 0.097), (0.83, 0.98)])  # water fills the wand behind the air
    splat, pooling, cupped = hand()
    spray = spit() + flow * jets(splat)
    splatter = flow * splash(splat, pooling, cupped) + drips() + palm()
    water = spray + splatter + reflections(spray, splatter)
    right_tilt = amp([[-.7], [.7]])  # left, right
    return ports(water, NEAR, LEAD, SHADING) + (ticks + surroundings) * right_tilt


def record(dry):
    """Band limiting: nothing at or above TOP_HZ is kept."""
    return filtered(dry, lambda hz: hz < TOP_HZ)


dry = scene()
out = record(dry)
master(out)
```